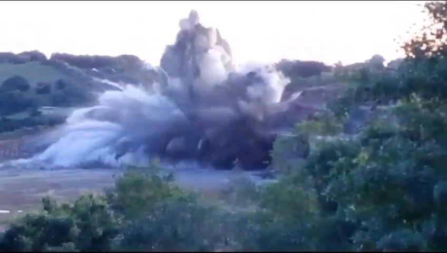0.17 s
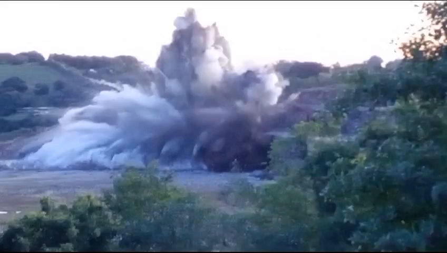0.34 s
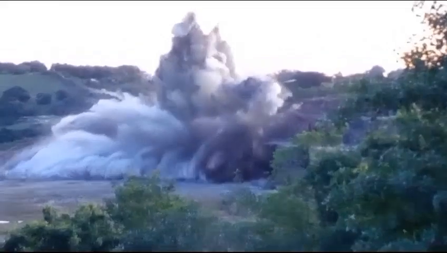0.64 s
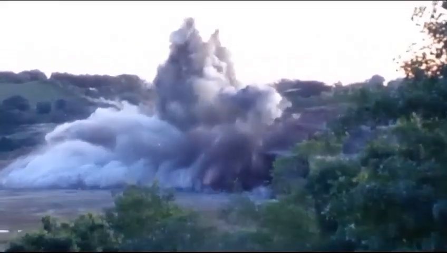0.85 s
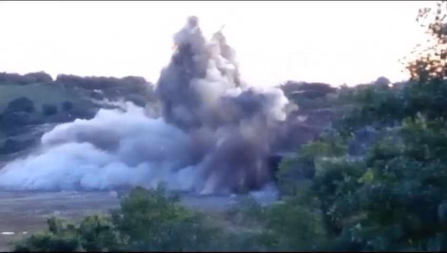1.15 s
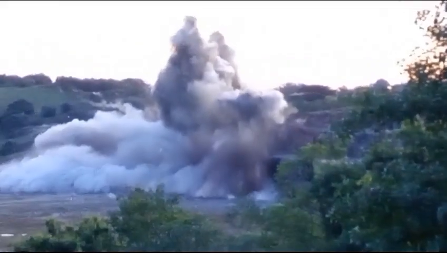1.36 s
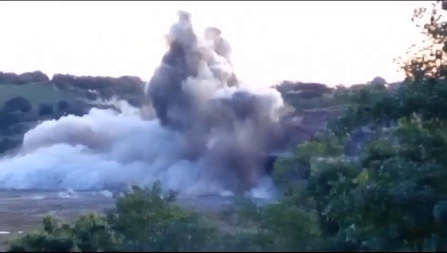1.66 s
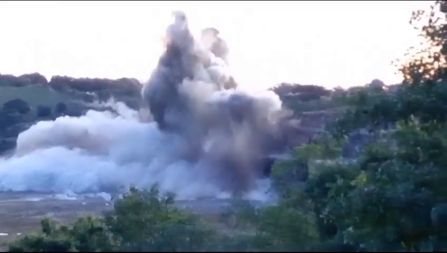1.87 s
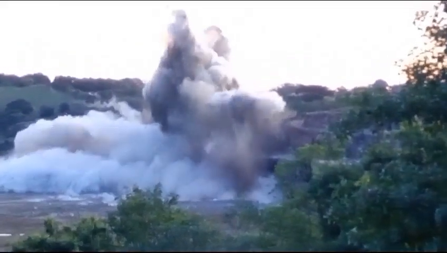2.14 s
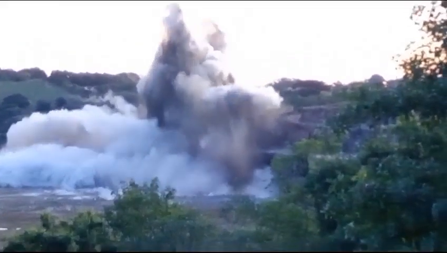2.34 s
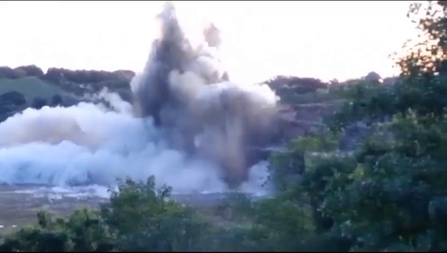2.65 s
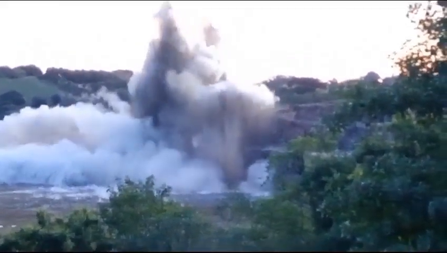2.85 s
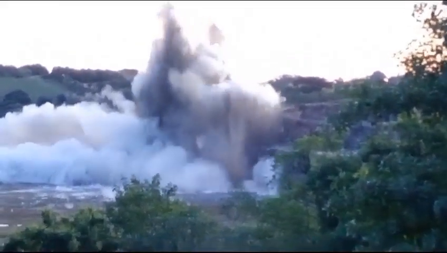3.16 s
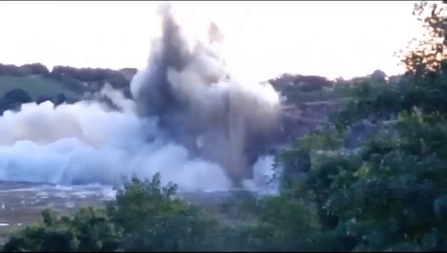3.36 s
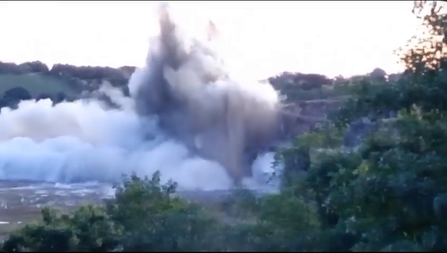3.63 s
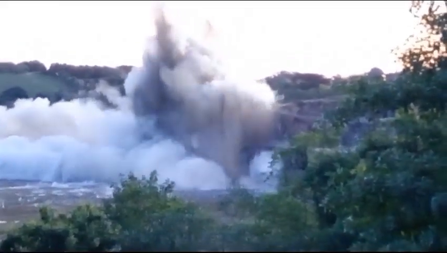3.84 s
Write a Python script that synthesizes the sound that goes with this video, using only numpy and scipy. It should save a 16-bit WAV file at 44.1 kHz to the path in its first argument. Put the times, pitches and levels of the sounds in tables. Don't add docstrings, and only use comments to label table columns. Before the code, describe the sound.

Loud blast outdoors: crackling charges within half a second, deep rolling peals and dull echoes, then sliding rock dying down, with single stone knocks and faint debris patter near the end, heard from afar.

```python
import sys
import numpy as np
from scipy import signal
from scipy.fft import rfft, irfft, next_fast_len
from scipy.io import wavfile
from scipy.ndimage import map_coordinates

SR = 44100
rng = np.random.default_rng(int(sys.argv[2]) if len(sys.argv) > 2 else 0)


def master_out(mix):
    frames = np.transpose(np.atleast_2d(mix))
    ceiling = np.clip(frames, -1, 1)
    pcm = np.round(ceiling * 32767).astype(np.int16)
    wavfile.write(sys.argv[1], SR, pcm)


def invert_db(level):
    return 10 ** (np.asarray(level, dtype=float) / 20)


N = 176400
T_S = np.arange(N) / SR


def unit(x):
    return x / np.sqrt(np.mean(x ** 2) + 1e-20)


def curve(rows):
    time_s, level_db = np.transpose(rows)
    return invert_db(np.interp(T_S, time_s, level_db))


def wobble(rate_hz):
    knots = rng.standard_normal(int(N * rate_hz / SR) + 4)
    return map_coordinates(knots, [np.arange(N) * rate_hz / SR])


def coloured(x, points):
    below = (points[0][0] / 8, points[0][1] - 32)
    above = (8 * points[-1][0], points[-1][1] - 3 * 24)
    hz, level_db = np.transpose([below] + list(points) + [above])
    size = 2 * next_fast_len(N // 2 + SR // 8)
    log_hz = np.log(np.fft.rfftfreq(size, 1 / SR) + 1)
    cepstrum = irfft(np.log(invert_db(np.interp(log_hz, np.log(hz), level_db))), size)
    cepstrum[1:size // 2] *= 2
    cepstrum[size // 2 + 1:] = 0
    return irfft(rfft(x, size) * np.exp(rfft(cepstrum)), size)[:N]


def rubble(points, spread_db, hiss):
    size_db = spread_db * np.minimum(rng.exponential(size=N), 6.5)
    grains = rng.standard_normal(N) * invert_db(size_db)
    return unit(coloured(unit(grains) + hiss * rng.standard_normal(N), points))


def bursts(rows, points, tail_db, tail_s):
    gain = np.zeros(N + SR)
    t = np.arange(SR // 4) / SR
    tail = invert_db(tail_db - 60 * t / tail_s)
    for time_s, peak_db, length_s in rows:
        snap = np.exp(-(t / max(length_s, 1e-3)) ** 2)
        gain[round(time_s * SR):][:len(t)] += invert_db(peak_db) * (snap + tail)
    noise = rng.standard_normal(N)
    return coloured(gain[:N] * noise, points) / np.std(coloured(noise, points))


def bell(middle_s, length_s):
    return np.exp(-(2 * (T_S - middle_s) / length_s) ** 2)


def wavelets(rows):
    out = np.zeros(N)
    for (middle_s, peak_db, hz, length_s), phase in zip(rows, rng.uniform(0, 2 * np.pi, len(rows))):
        swing = np.cos(2 * np.pi * hz * (T_S - middle_s) + phase)
        out += invert_db(peak_db) * bell(middle_s, length_s) * swing
    return out


def steps(rows):
    gain_db = np.zeros(N)
    for middle_s, length_s, change_db in rows:
        near = np.arange(round((middle_s - length_s) * SR), round((middle_s + length_s) * SR))
        gain_db[near] += change_db * np.exp(-(2 * (near / SR - middle_s) / length_s) ** 4)
    return invert_db(gain_db)


def squash(x, top, knee):
    return x / (1 + np.abs(x / top) ** knee) ** (1 / knee)


# (time [s], peak [dB], length [s])
CRACKS = [(0, -13, .0015), (.022, -11, .004), (.030, -19, .002), (.038, -13, .003), (.0455, -14, .002),
          (.050, -11, .003), (.055, -13, .004), (.0645, -12, .005), (.071, -12, .003), (.075, -12, .003),
          (.090, -20, .003), (.102, -12, .002), (.109, -12, .0025), (.133, -22, .004), (.1765, -18, .003),
          (.1945, -15, .005), (.2498, -14, .0015), (.2788, -17, .005), (.304, -30, .002),
          (.3222, -23, .003), (.336, -27, .003), (.402, -32, .004), (.434, -35, .002), (.4763, -28, .002),
          (.495, -36, .003), (.5352, -32, .002)]
# (frequency [Hz], level [dB])
CRACK_COLOUR = [(300, 4.5), (1000, 11.5), (2200, 3.5), (4000, 4.5), (6000, -1), (7000, -7.5), (9000, -8.5),
                (15000, -22.5)]


def charges():
    return invert_db(-1.5) * bursts(CRACKS, CRACK_COLOUR, tail_db=-16, tail_s=.03)


# (time [s], level [dB])
ROLL = [(0, -7.5), (.15, -8), (.3, -12.5), (.45, -15), (.6, -19.5), (.9, -21.5), (1.25, -25.5), (1.35, -31),
        (1.83, -34.5), (2.2, -37.5), (2.5, -40), (3.1, -39.5), (3.55, -38), (3.73, -39), (3.8, -35),
        (4, -33.5)]
# (middle [s], length [s], change [dB])
LULLS = [(.189, .025, -5), (.32, 0.031, -3.5), (.469, .03, -6), (.562, .025, -4), (.607, 0.032, -2.5),
         (.69, 0.032, -4.5), (.768, 0.02, -10), (.823, 0.015, 0.5), (.878, 0.041, -5), (1.025, 0.028, -3),
         (1.1, 0.03, 1.5), (1.305, 0.036, -3.5), (3.71, 0.044, -12)]
# (middle [s], peak [dB], pitch [Hz], length [s])
PEALS = [(.075, -14, 30, .05), (.26, -16, 32, .05), (.265, -8, 150, .014), (.347, -6, 110, .016),
         (.402, -6, 129, .026), (.438, -8, 120, .014), (.497, -10, 127, .02), (.535, -10, 150, .018),
         (.635, -9, 140, .016), (.75, -15, 140, .022), (.797, -12, 151, .016), (.84, -18, 110, .025),
         (.948, -17, 121, .016), (1.01, -19, 127, .02), (1.147, -11, 120, .011), (1.197, -17, 137, .015),
         (1.228, -15, 100, .012), (3.94, -27, 250, .012), (.035, -7, 130, .025), (.12, -4, 130, .035),
         (.215, -4, 160, .04), (.293, -6, 120, .03), (.51, -15, 230, .03), (.53, -12, 255, .02),
         (.59, -14, 150, .025), (.59, -23, 260, .025), (.725, -23, 240, .025), (1.35, -25, 110, .025)]
# (frequency [Hz], level [dB])
BOOM_COLOUR = [(20, -39.5), (50, -9.5), (120, -3), (230, -8), (320, -9.5), (420, -22), (800, -32.5),
               (3000, -79.5)]


def booms():
    flutter = invert_db(0.22 * wobble(6.7) + 0.52 * wobble(35))
    roll = curve(ROLL) * steps(LULLS) * flutter * rubble(BOOM_COLOUR, spread_db=2.5, hiss=0.73)
    return roll + wavelets(PEALS)


# (time [s], level [dB])
FALL = [(0, -14), (.02, -9), (.2, -12.5), (.35, -14.5), (.52, -23), (.6, -25), (.86, -25), (.9, -26),
        (1.3, -29.5), (1.6, -28.5), (2.1, -33), (2.64, -37.5), (3.3, -36), (3.7, -36.5), (3.8, -33.5),
        (4, -33.5)]
# (middle [s], length [s], change [dB])
SLUMPS = [(.516, 0.048, 3.5), (.565, 0.012, 3), (.613, 0.012, -0.5), (.745, 0.033, 2), (.855, 0.034, 3.5),
          (.889, 0.018, -3), (.995, 0.026, -2.5), (1.017, .02, 1), (1.04, 0.031, -2.5), (1.073, 0.019, 3),
          (1.096, 0.029, -1), (1.165, .03, -1), (1.2, .03, 4.5), (1.248, .03, 0), (1.42, 0.02, 0.5),
          (1.495, 0.032, 0), (1.664, 0.026, 1), (1.73, .04, 0)]
# (middle [s], peak [dB], pitch [Hz], length [s])
STONES = [(.755, -18, 1800, .002), (.975, -22, 2200, .002), (1.135, -21, 2200, .002),
          (1.415, -21, 1500, .002), (1.626, -21, 1500, .002), (1.982, -21, 1300, .0015),
          (2.056, -25, 700, .002), (3.105, -28, 1500, .002), (3.657, -30, 1300, .002),
          (3.786, -28, 800, .003), (3.864, -24, 700, .002), (3.952, -24, 480, .005),
          (3.976, -22, 1750, .003)]
# (frequency [Hz], level [dB])
ROCK_COLOUR = [(250, -1.5), (420, -7.5), (630, -1), (900, -8), (1950, -8), (3300, -25), (5600, -40.5),
               (6600, -54)]


def rockfall():
    clumps = invert_db(0.35 * wobble(10) + 0.92 * wobble(45))
    roar = curve(FALL) * steps(SLUMPS) * clumps * rubble(ROCK_COLOUR, spread_db=3.5, hiss=1.0)
    return roar + wavelets(STONES)


# (time [s], peak [dB], length [s])
ECHOES = [(.167, -23, .003), (.186, -21, .003), (.220, -27, .002), (.233, -26, .003), (.358, -30, .003),
          (.378, -31, .003), (.412, -32, .002), (.5122, -35, .003), (.5756, -33, .006), (.622, -37, .003),
          (.634, -36, .003), (.7347, -40, .003), (.821, -44, .003), (.8574, -44, .005), (.914, -48, .003),
          (1.0091, -43, .002), (1.0675, -46, .003), (1.197, -48, .006), (1.3688, -48, .003)]
# (frequency [Hz], level [dB])
ECHO_COLOUR = [(300, -8), (2000, 25), (4000, 6.5), (6000, 1.5), (8000, -11), (12000, -28)]


def echoes():
    return invert_db(2.5) * bursts(ECHOES, ECHO_COLOUR, tail_db=-16, tail_s=.03)


# (frequency [Hz], level [dB])
WASH_COLOUR = [(300, -2.5), (2000, -1), (4000, -4), (6000, -8), (7200, -20.5), (9000, -26), (15000, -44)]


def valley_wash():
    level_db, rise_s, t60_s = -14.5, 0.02, 0.99
    decay = invert_db(level_db - 60 * T_S / t60_s + 2.5 * wobble(91))
    rise = 1 - np.exp(-T_S / rise_s)
    return decay * rise * rubble(WASH_COLOUR, spread_db=4.5, hiss=0.75)


# (time [s], level [dB])
PATTER = [
    (0, -45),
    (.2, -35),
    (.6, -61),
    (1.2, -70.5),
    (2.5, -65),
    (2.9, -61.5),
    (3.2, -54),
    (3.5, -53),
    (3.85, -48),
    (4, -51.5),
]
# (frequency [Hz], level [dB])
GRIT_COLOUR = [(3200, 5), (6800, -7.5), (7800, -18.5), (9200, -19), (10200, -25.5), (11500, -21),
               (12600, -29), (15000, -27)]


def debris():
    gusts = invert_db(0.61 * wobble(20) + 1.1 * wobble(46))
    return curve(PATTER) * gusts * rubble(GRIT_COLOUR, spread_db=5.5, hiss=1.5)


# (middle [s], level [dB], pitch [Hz], glide [Hz/s], length [s])
WHISTLES = [(3.39, -61, 5400, 600, .08), (3.75, -59, 5350, 300, .07), (3.88, -59, 5450, 0, .12),
            (3.69, -58, 4750, 0, .06), (3.26, -61, 4400, -300, .12), (3.43, -54, 3990, 100, .2),
            (3.44, -59, 4300, 0, .14), (3.44, -60, 5650, 0, .08), (3.58, -54, 4190, 0, .18),
            (3.69, -55, 4220, 200, .12), (3.785, -54, 3740, -500, .07), (3.92, -54, 4530, 100, .2),
            (3.92, -57, 4830, 900, .07)]


def whistles():
    out = np.zeros(N)
    for middle_s, level_db, hz, glide_hz_per_s, length_s in WHISTLES:
        t = T_S - middle_s
        strength = .6 + .5 * wobble(110)
        phase = 2 * np.pi * (hz + glide_hz_per_s * t / 2) * t + 1.3 * wobble(45)
        out += invert_db(level_db) * bell(middle_s, length_s) * strength * np.sin(phase)
    return out


# (time [s], peak [dB])
TICKS = [
    (.5207, -50),
    (.635, -58),
    (.7498, -56),
    (.7901, -54),
    (.9901, -65),
    (1.0201, -65),
    (1.1303, -61),
    (1.1902, -66),
]


def camera_ticks():
    ticks = np.zeros(N)
    for time_s, peak_db in TICKS:
        ticks[round(time_s * SR) + 40] = invert_db(peak_db + 13)
    return coloured(ticks, [(9000, 0.0061), (16000, 0.0082)])


# (time [s], peak [dB], length [s])
RUSTLE = [
    (1.009, -64, .02),
    (1.03, -65, .03),
    (1.062, -65.5, 0.028),
    (1.09, -73, 0.031),
]
# (frequency [Hz], level [dB])
LEAF_COLOUR = [(4000, -5.5), (6000, 6), (10000, -10), (15000, -23.5)]


def branch_rustle():
    return bursts(RUSTLE, LEAF_COLOUR, tail_db=-16, tail_s=.15)


# (frequency [Hz], level [dB])
HISS_COLOUR = [(8200, -11.5), (11000, 0), (13500, -6.5)]


def microphone_hiss():
    return invert_db(-88) * rubble(HISS_COLOUR, spread_db=-2.5, hiss=0.91)


# (middle [s], length [s], damping [dB])
SURGES = [(.0615, .004, -14), (.1005, .002, -14), (.106, .002, -14), (.1145, .002, -12), (.121, .002, -12),
          (.131, .002, -14), (.1605, .003, -25), (.174, .004, -28), (.340, .003, -22), (.4395, .003, -17),
          (.206, .002, -10), (.217, .003, -14), (.224, .002, -12), (.247, .002, -12), (.259, .002, -25),
          (.269, .002, -9), (.273, .002, -12), (.287, .003, -14), (.318, .003, -15), (.328, .002, -13),
          (.348, .002, -18), (.386, .002, -9), (.396, .002, -16), (.401, .002, -16), (.419, .002, -9),
          (.459, .003, -7), (.4745, .002, -10)]


def pinned(detail):
    return steps(SURGES) * detail


def scene():
    blast = charges() + echoes() + valley_wash()
    falling = rockfall() + debris() + whistles()
    nearby = camera_ticks() + branch_rustle()
    return (booms() + pinned(blast + falling + nearby) + microphone_hiss())[None]


def band_limit(x):
    return signal.sosfilt(signal.butter(12, 15550, fs=SR, output="sos"), x)


def record(dry):
    capsule = squash(dry, top=1.05, knee=2.6)
    low_cut = signal.butter(2, 45, "high", fs=SR, output="sos")
    mix = squash(signal.sosfilt(low_cut, capsule), top=.86, knee=6)
    return band_limit(mix)


dry = scene()
out = record(dry)
master_out(out)
```